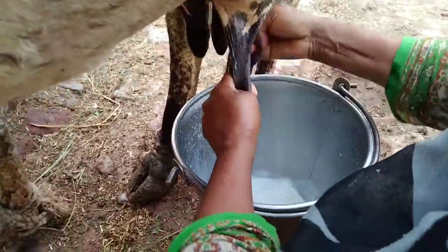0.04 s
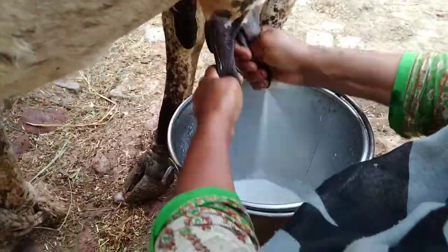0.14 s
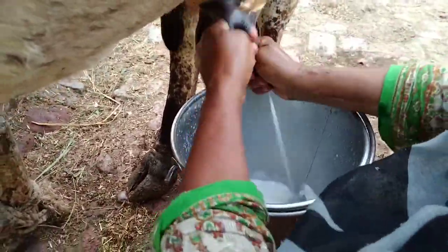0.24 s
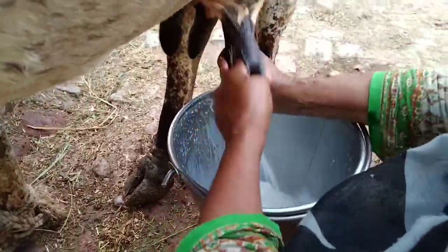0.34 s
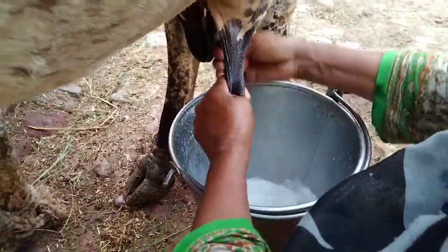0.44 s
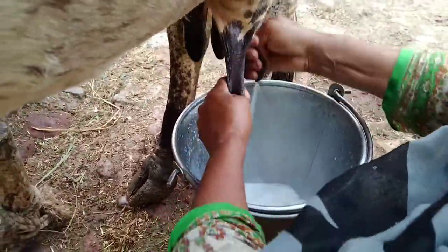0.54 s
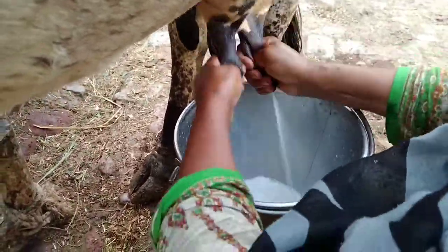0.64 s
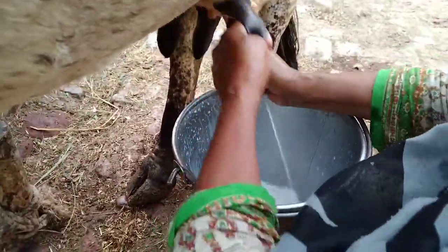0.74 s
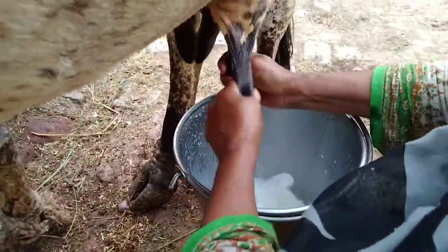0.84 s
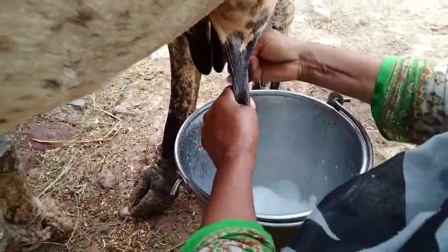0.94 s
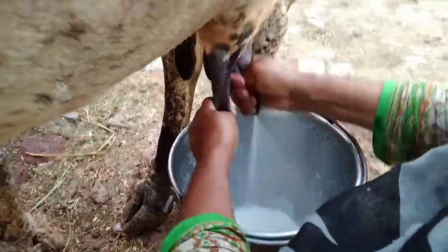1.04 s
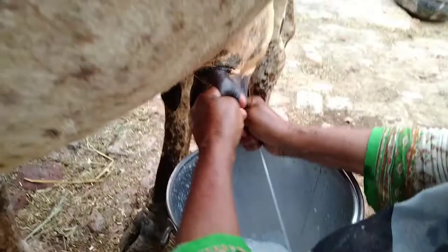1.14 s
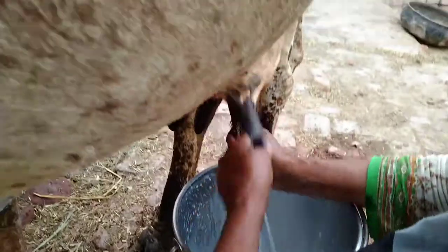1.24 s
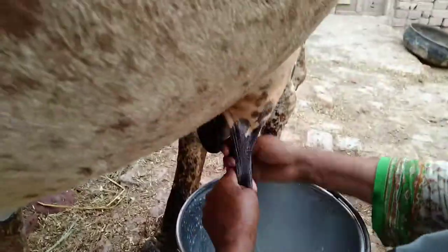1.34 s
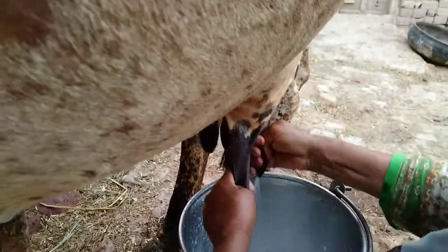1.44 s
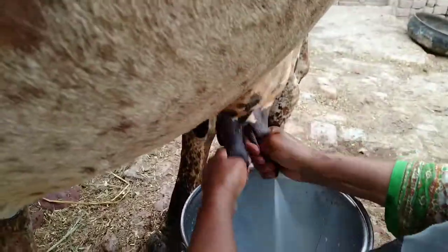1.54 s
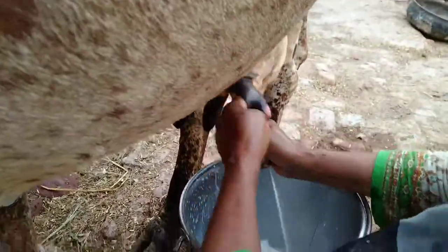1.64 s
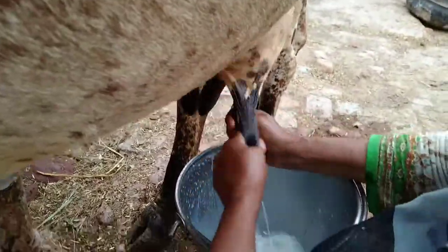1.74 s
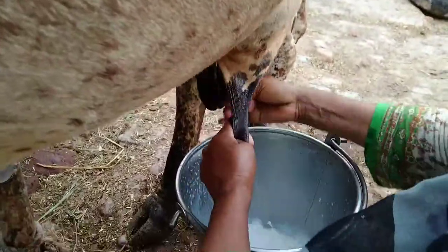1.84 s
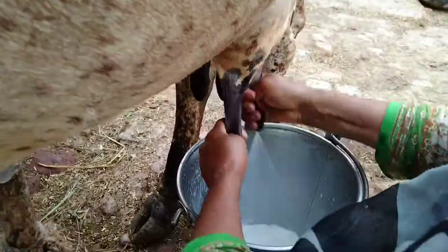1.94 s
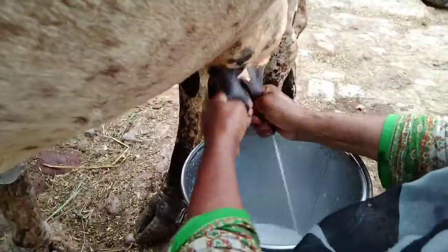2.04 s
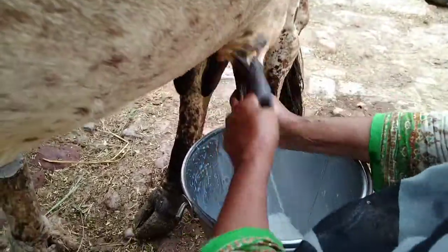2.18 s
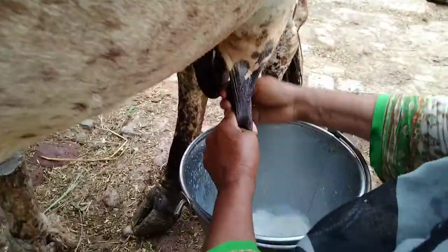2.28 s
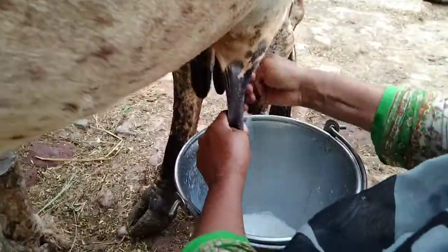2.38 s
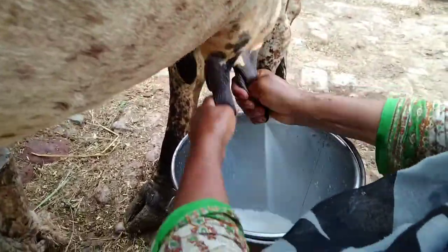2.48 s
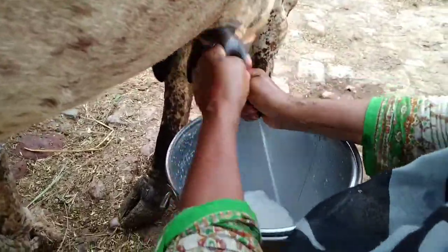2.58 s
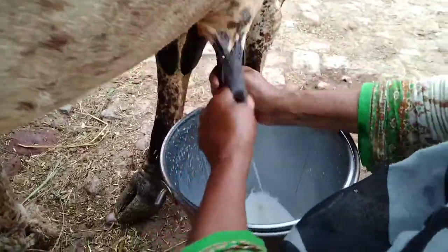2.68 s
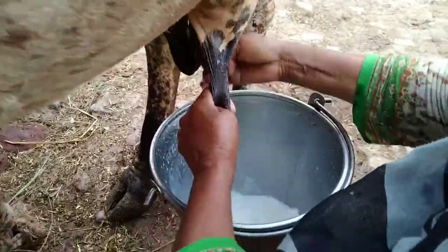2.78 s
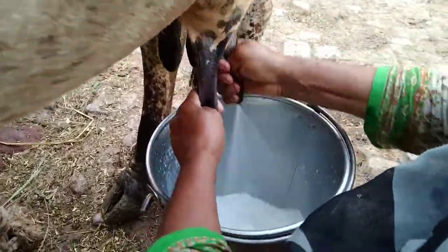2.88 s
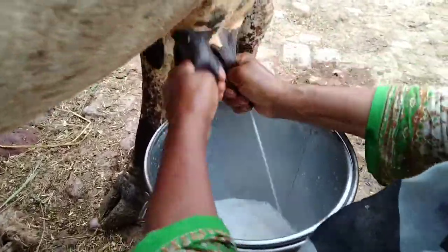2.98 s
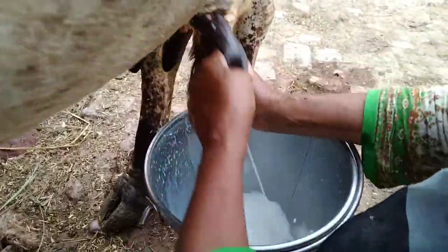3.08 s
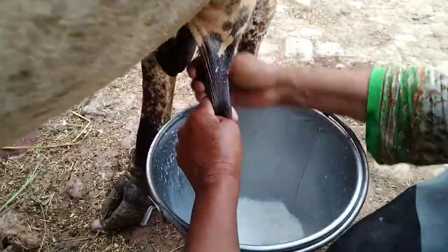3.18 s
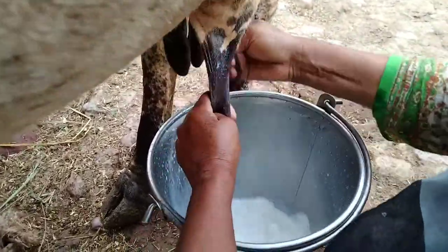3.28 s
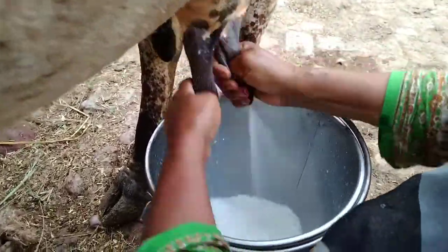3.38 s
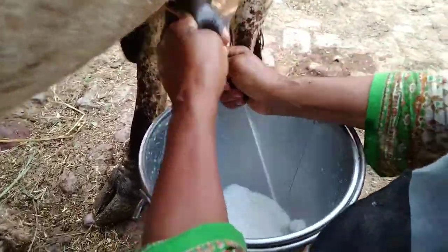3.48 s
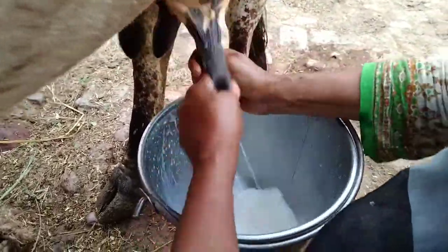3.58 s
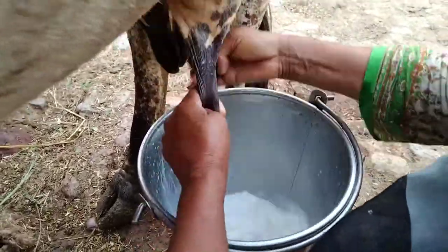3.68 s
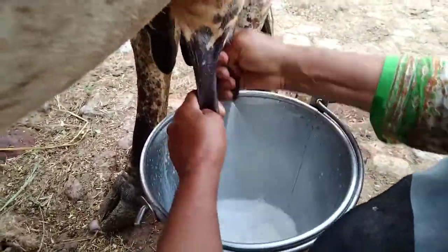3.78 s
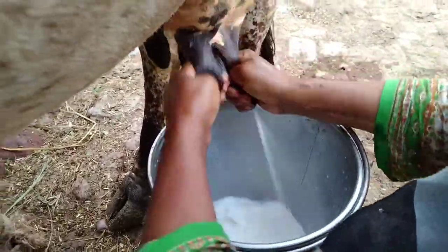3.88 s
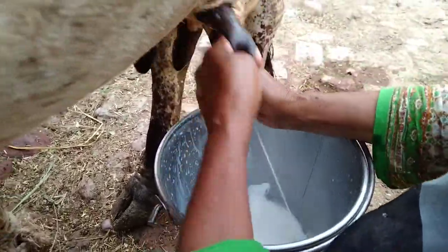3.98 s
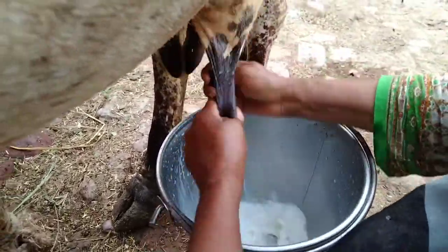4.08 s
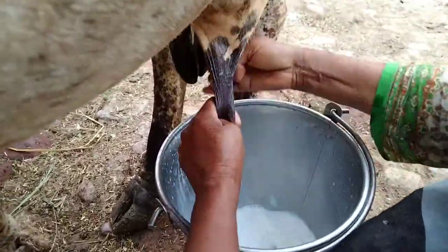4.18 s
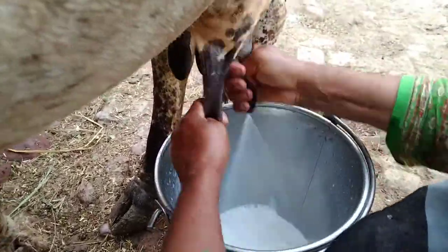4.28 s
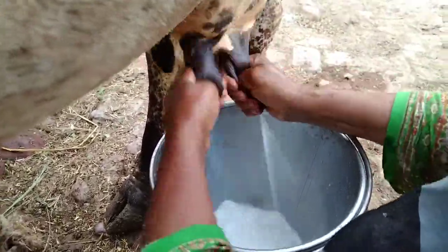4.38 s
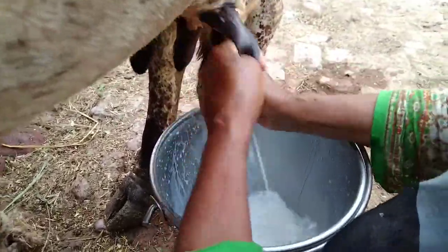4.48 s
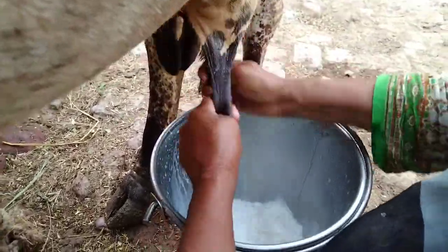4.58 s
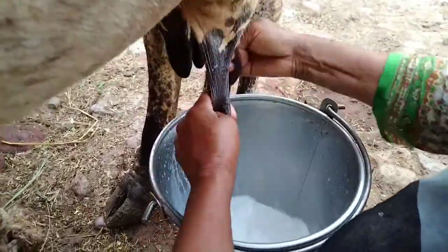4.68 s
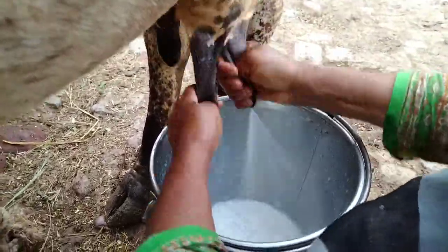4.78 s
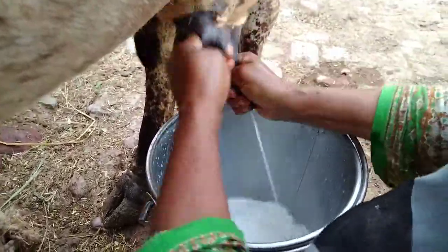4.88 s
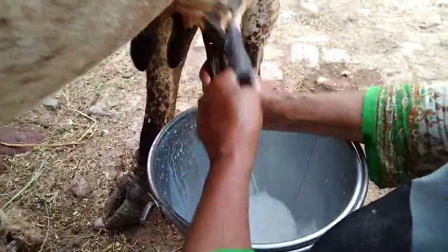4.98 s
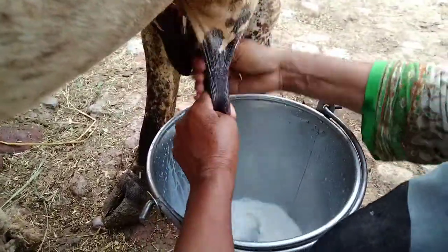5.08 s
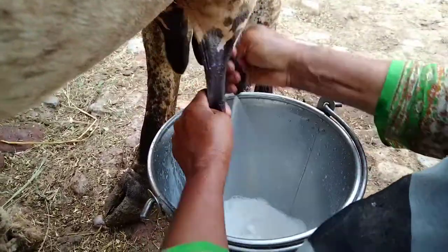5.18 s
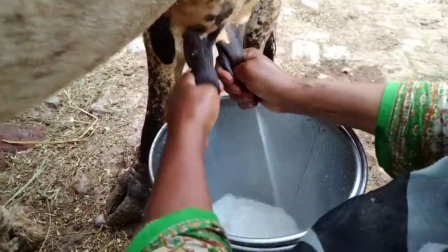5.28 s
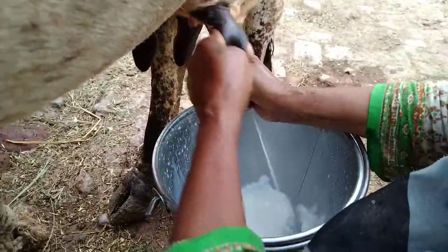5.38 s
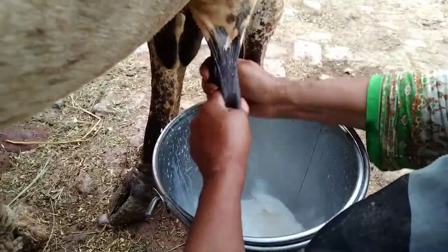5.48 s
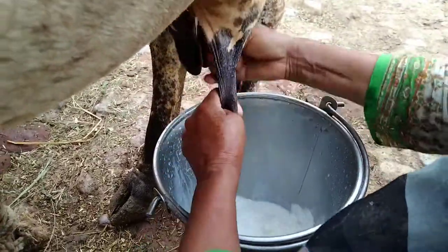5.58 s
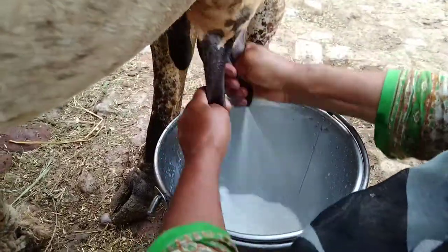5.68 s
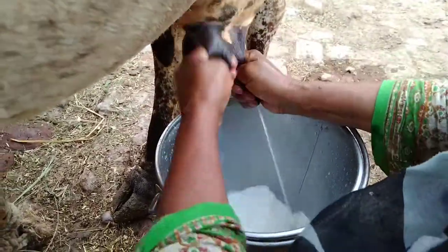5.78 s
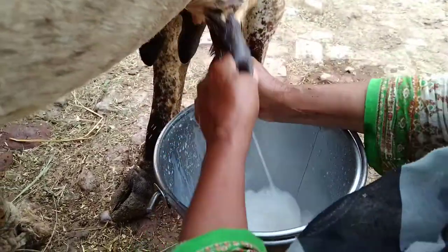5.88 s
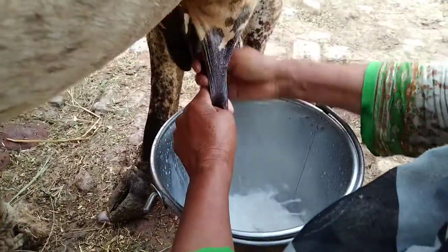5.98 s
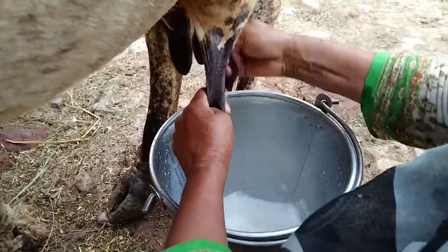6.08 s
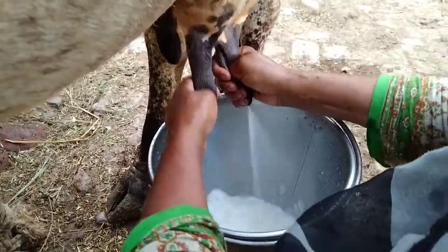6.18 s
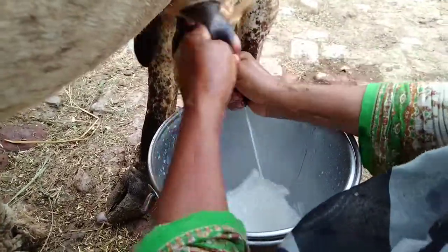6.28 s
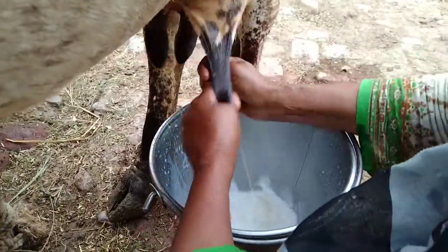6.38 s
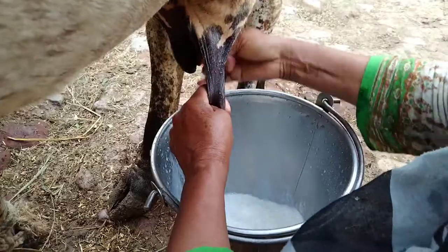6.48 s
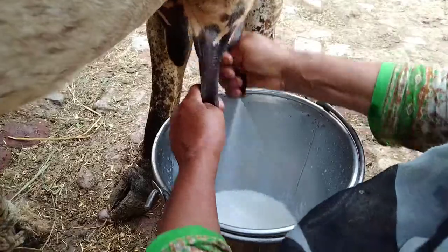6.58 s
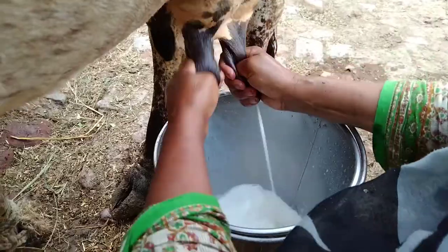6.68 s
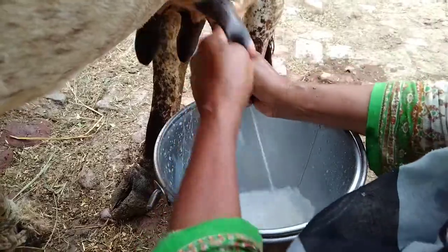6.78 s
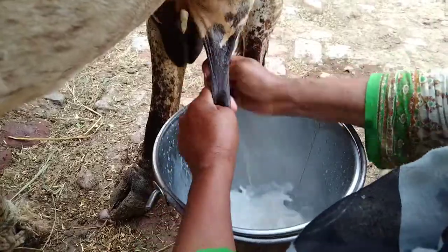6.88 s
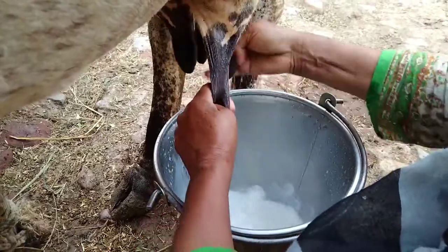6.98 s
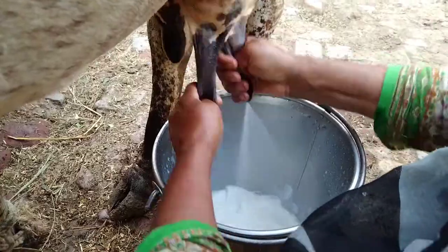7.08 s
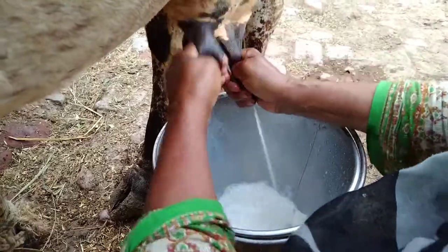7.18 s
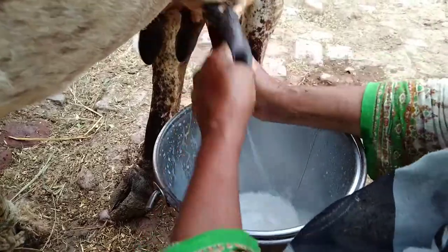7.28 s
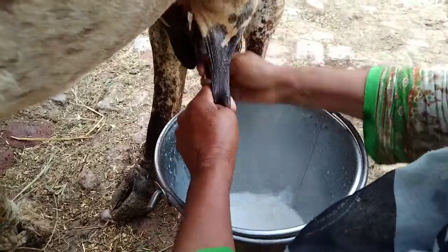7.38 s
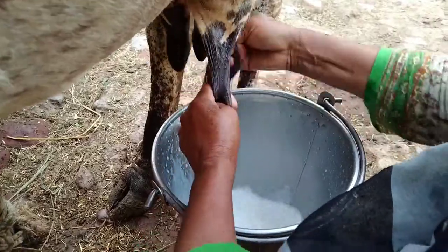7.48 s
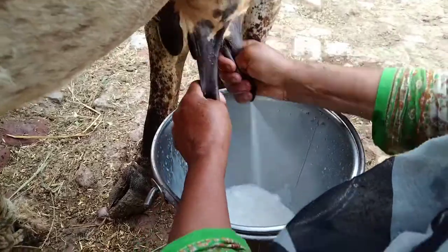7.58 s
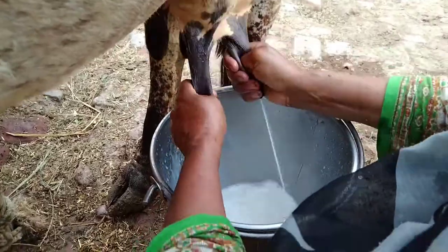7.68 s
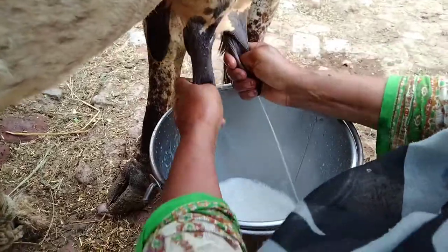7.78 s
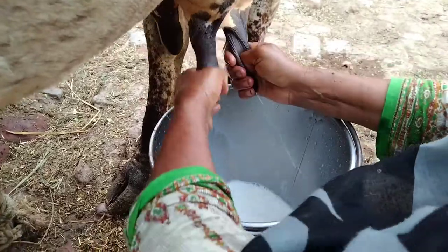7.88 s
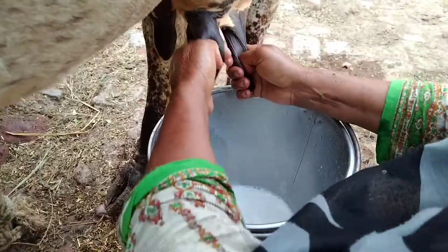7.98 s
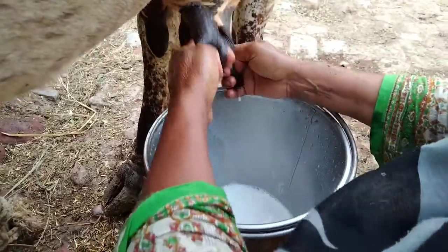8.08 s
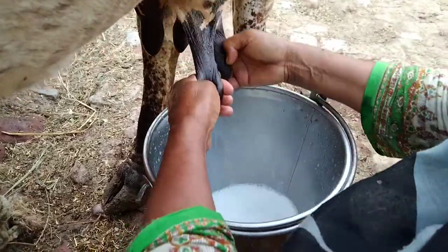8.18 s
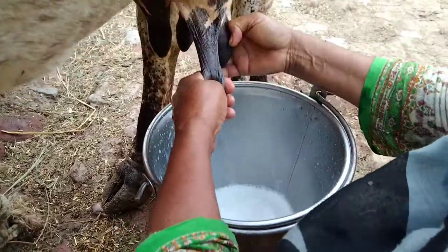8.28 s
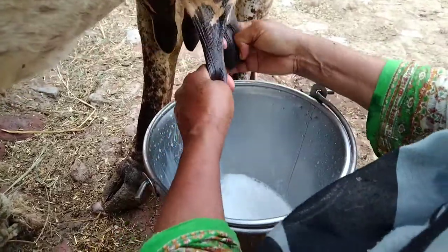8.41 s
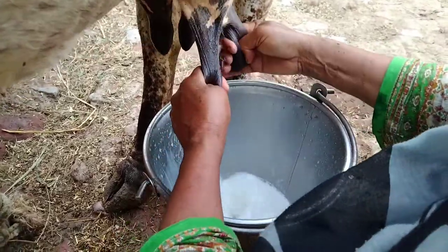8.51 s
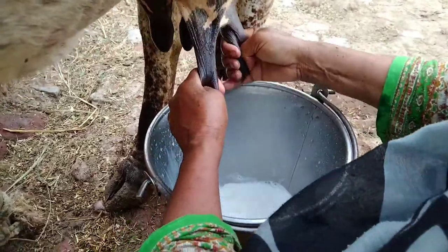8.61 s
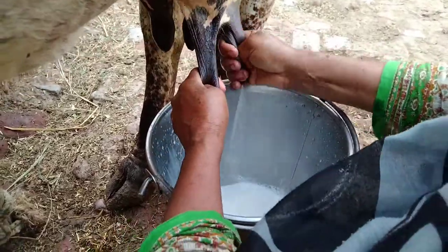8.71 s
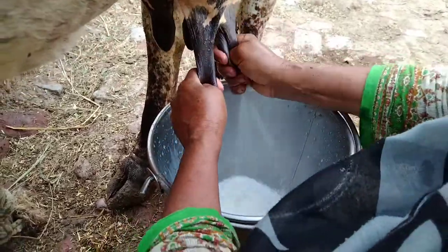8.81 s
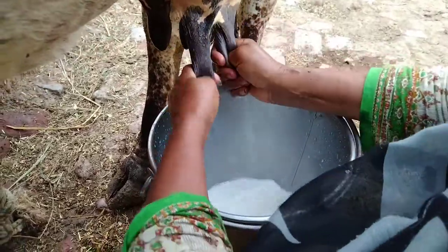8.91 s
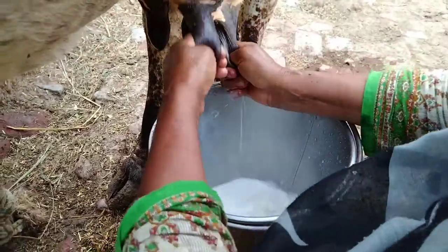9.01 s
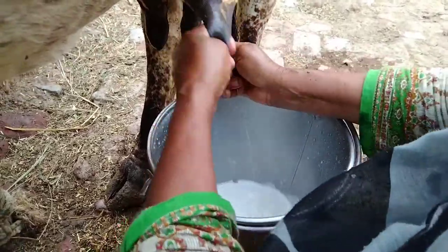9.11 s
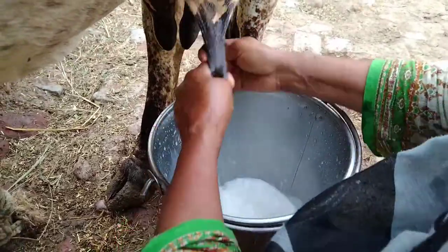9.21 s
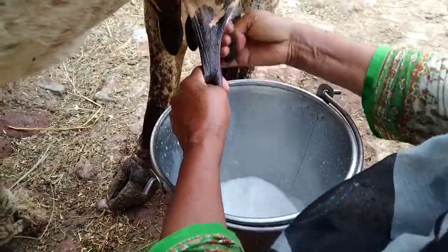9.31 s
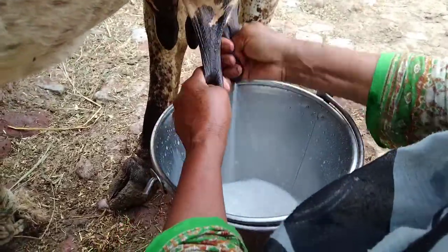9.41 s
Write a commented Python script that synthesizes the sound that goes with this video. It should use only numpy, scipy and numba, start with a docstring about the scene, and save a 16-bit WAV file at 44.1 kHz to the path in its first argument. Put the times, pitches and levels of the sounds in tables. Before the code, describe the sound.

Close rhythmic hand milking: sharp hissing spurts strike a steel bucket, gurgle into foam with hollow booms, pause briefly, then resume more slowly.

```python
"""A cow is milked by hand into a steel pail, a phone close by; a quiet farmyard hum lies under it. A few drops
lead each squirt, then the jet hisses as noise and drums on the ringing wall, two hands taking turns. It plunges
through the froth in a swarm of sine bubbles; the air in the pail booms, large air pockets gulp out short
pitched tones and now and then a lone small drop blips. After a pause near 8 s the last squirts come slower."""
import sys
import numpy as np
from scipy import signal
from scipy.fft import rfft, irfft, next_fast_len
from scipy.io import wavfile
from scipy.ndimage import uniform_filter1d
from numba import njit

SR = 44100
rng = np.random.default_rng(int(sys.argv[2]) if len(sys.argv) > 2 else 0)


def dump(signal):
    """Clip the signal to [-1, 1] and save it as 16-bit WAV at the path in sys.argv[1]."""
    limited = np.clip(np.atleast_2d(signal).T, -1, 1)
    pcm = np.round(limited * 32767).astype(np.int16)
    wavfile.write(sys.argv[1], SR, pcm)


N = 416744

# squeezes of a teat, hands alternating; levels relative:
# start_s, length_s, fade_db_per_s, hiss_db, mist_above_hiss_db, drum_db
SQUIRTS = [(-0.068, 0.2, 150, -37, 10.5, -25.5), (0.206, 0.16, 142, -33, 6, -26),
           (0.39, 0.26, 253, -39.5, 14.5, -27), (0.655, 0.19, 117, -36, 9.5, -30.5),
           (0.872, 0.2, 246, -37, 11.5, -27.5), (1.119, 0.12, 82, -33, 9, -28),
           (1.304, 0.25, 177, -38.5, 8.5, -29), (1.589, 0.19, 200.5, -35.5, 6, -30),
           (1.747, 0.25, 180, -35.5, 3, -28.5), (2.056, 0.19, 71, -32.5, -3, -27.5),
           (2.261, 0.23, 211, -33.5, -4, -28), (2.522, 0.24, 129.5, -33.5, -3, -30),
           (2.742, 0.2, 160, -34, -0.5, -27), (2.975, 0.19, 124, -32.5, -5.5, -29.5),
           (3.166, 0.21, 203, -32.5, -6, -27), (3.427, 0.15, 74, -33, -0.5, -28),
           (3.645, 0.21, 192, -31.5, -3.5, -26), (3.884, 0.2, 203, -34, -2, -27.5),
           (4.096, 0.26, 206, -35, 3, -24.5), (4.366, 0.19, 128, -34.5, 0, -27),
           (4.585, 0.21, 152, -32.5, -0.5, -23.5), (4.842, 0.18, 220.0, -33.5, -5, -26.5),
           (5.037, 0.25, 278, -34.5, 1, -23.5), (5.297, 0.074, 80, -30, -2.5, -23),
           (5.507, 0.21, 368, -33.5, 0.5, -24.5), (5.744, 0.2, 89, -34, -7, -28),
           (5.962, 0.23, 260.0, -33.5, -3, -24.5), (6.21, 0.2, 102, -33, -6.5, -27),
           (6.41, 0.24, 208, -34.5, -2.5, -25.5), (6.683, 0.054, 67, -33, -1, -24),
           (6.895, 0.23, 374, -33.5, -3, -25), (7.16, 0.22, 454, -36.5, -2, -26),
           (7.352, 0.26, 229.5, -35, -1.5, -26), (7.637, 0.18, 111, -33, -7, -27),
           (8.447, 0.3, 214, -35.5, -3.5, -27), (8.853, 0.2, 233, -37.5, -2, -29),
           (9.225, 0.26, 297, -36.5, -4, -28)]
# jets breaking through the froth; levels relative:
# start_s, length_s, level_db, growth_start_to_end_db, bubble_pitch_hz, boom_pitch_hz, boom_db
PLUNGES = [(0.072, 0.11, -33, 10, 1570, 336, -30.5), (0.342, 0.08, -24.5, 4.5, 1517, 493, -49.5),
           (0.56, 0.066, -35, 6, 1720, 356, -39.5), (0.816, 0.078, -25, 4, 1380, 470, -44),
           (1.021, 0.085, -27.5, -4, 1370, 357, -29), (1.271, 0.08, -26, 3, 1466, 457, -52),
           (1.464, 0.11, -32.5, -6, 1435, 318, -33.5), (1.752, 0.067, -23.5, 3, 1396, 496, -42),
           (1.939, 0.099, -30.5, -7, 1340, 325, -32), (2.209, 0.066, -25, 7, 1468, 480, -58),
           (2.389, 0.13, -29.5, 4, 1384, 334, -35.5), (2.689, 0.064, -22, -1.5, 1400, 513, -37),
           (2.872, 0.091, -25, -4, 1470, 345, -28), (3.137, 0.068, -25, -14, 1676, 474, -50),
           (3.328, 0.066, -24, -5, 1270, 350, -27), (3.598, 0.063, -27.5, -6, 1680, 457, -62),
           (3.789, 0.12, -32.5, -8, 1490, 328, -33.5), (4.083, 0.055, -27.5, -8, 1720, 470, -58),
           (4.294, 0.05, -28.5, -11, 1250, 330, -33), (4.551, 0.055, -24.5, -9, 1588, 490, -38),
           (4.738, 0.081, -27.5, 6, 1560, 328, -30.5), (5.01, 0.06, -23.5, -3.5, 1772, 490, -38),
           (5.183, 0.07, -25, -1, 1550, 383, -34), (5.448, 0.088, -26, -4.5, 1745, 470, -68),
           (5.642, 0.067, -27.5, 15, 1820, 324, -33.5), (5.905, 0.087, -24, -2.5, 1755, 470, -57),
           (6.102, 0.095, -29, 2, 1697, 332, -35), (6.388, 0.064, -21.5, 5, 1440, 515, -43),
           (6.576, 0.059, -23.5, 1, 1760, 342, -32.5), (6.823, 0.068, -22, -4, 1397, 350, -30),
           (7.041, 0.067, -26, 19, 1853, 358, -34), (7.316, 0.053, -20.5, 5, 1700, 464, -41.5),
           (7.529, 0.095, -26.5, -7, 1450, 330, -30.5), (8.563, 0.11, -34, 11, 1780, 315, -39),
           (8.667, 0.079, -22.5, -9, 1742, 494, -49), (9.377, 0.061, -25, 1, 1790, 330, -40)]


def undb(db):
    """Gain of a level in dB."""
    return 10 ** (np.asarray(db) / 20)


def level(x, db):
    """Scale to an rms level in dB."""
    return x * undb(db) / np.sqrt(np.mean(x ** 2))


def colour(x, points):
    """Shape a spectrum by (hz, db) points, interpolated over log frequency."""
    size = next_fast_len(N)
    hz, db = np.transpose(points)
    f_hz = np.arange(size // 2 + 1) * SR / size + 1  # +1 avoids log(0)
    gain = undb(np.interp(np.log(f_hz), np.log(hz), db))
    return irfft(rfft(x, size) * gain, size)[:N]


def ring(x, hz, width_hz):
    """One resonance, gain 1 at its centre."""
    return signal.lfilter(*signal.iirpeak(hz, hz / width_hz, SR), x)


def walk(rate_hz):
    """Random levels held 1 / rate_hz and slewed twice; spread near 1."""
    hold = int(SR / rate_hz)
    held = np.repeat(rng.standard_normal(N // hold + 1), hold)
    slewed = uniform_filter1d(uniform_filter1d(held, hold), hold)
    return 1.3 * slewed[:N]


def drops(scatter_db):
    """Dense droplets of uneven size: noise with a random level per sample."""
    return rng.standard_normal(N) * undb(scatter_db * rng.standard_normal(N))


@njit
def bubbles(start, hz, gain, cycles, glide, length):
    """Each bubble is a sine that swells in half a cycle and decays over some cycles while its pitch climbs."""
    out = np.zeros(length)
    for k in range(len(start)):
        step = 2 * np.pi * hz[k] / SR
        span = int(5 * cycles * SR / hz[k])
        for i in range(min(span, length - start[k])):
            age = i * hz[k] / (SR * cycles)  # in decay times
            shape = np.exp(-age) - np.exp(-age * 2 * cycles)
            out[start[k] + i] += gain[k] * shape * np.sin(step * i * (1 + glide * age))
    return out


def pail(x, ring_db, steel_db, wander_db):
    """Wall modes ring on top of the direct sound, each wavering as the jet lands elsewhere; bare steel rings longer."""
    # wall modes, levels relative: pitch_hz, width_hz, level_db, long_ring_db
    wall_modes = [(488, 16, -9.5, -15.5), (775, 72, -7, -23), (974.3, 35, -6.5, -0.5),
                  (1206, 85, -8.5, -6.5), (1336, 85, -12, -16), (1532, 55, -5, 3.5), (1781, 34, -13, -1),
                  (1971, 40, -11.5, -8), (2187, 22, -12, -15), (2368, 49, -10.5, -24), (2600, 25, -8, -18),
                  (2860, 24, -16, -30)]
    steel_q = 190
    out = x
    for hz, width_hz, db, long_db in wall_modes:
        struck = x * undb(wander_db * walk(13))
        short_ring = undb(ring_db + db) * ring(struck, hz, width_hz)
        long_ring = ring(struck * undb(steel_db + long_db), hz, hz / steel_q)
        out = out + short_ring + long_ring
    return out


def pressure(level_db, sag_db_per_s, linger, lead_db):
    """Gain over time of all squirts: drops lead, the jet rises, sags while the hand closes, then dies away."""
    land_s = 0.025  # the stream needs this long to reach the pail
    splat, splat_s = 0.071, 0.004  # share of strength landing at once, its build-up
    rise_s, lead_s = 0.086, 0.022  # pressure build-up; run of the leading drops
    rest_s, slow_start = 0.48, 0.12  # a longer gap between squirts starts softly: s of build-up per s beyond it
    tail_s, tail_fade_db_per_s = 0.27, 349  # after this long the tail of a squirt fades faster, by this much
    start_s, length_s, fade_db_per_s = np.array(SQUIRTS)[:, :3, None].transpose(1, 0, 2)
    t = np.arange(0, N + 64, 64) / SR
    age_s = np.maximum(t - start_s, 0)
    gap_s = np.diff(start_s, axis=0, prepend=start_s[:1])
    soft_s = slow_start * np.maximum(gap_s - rest_s, 0)

    db = level_db[:, None] - sag_db_per_s * np.minimum(age_s, length_s)
    db = db - linger * np.abs(fade_db_per_s) * np.maximum(age_s - length_s, 0)
    db = db - tail_fade_db_per_s * np.maximum(age_s - length_s - tail_s, 0)

    first_splat = splat * np.clip((age_s - land_s) / (splat_s + soft_s) + .5, 0, 1)
    build = (1 - np.exp(-np.maximum(age_s - land_s, 0) / rise_s)) ** 1.315
    lead = undb(lead_db) * np.exp(np.minimum(t - start_s, 0) / (lead_s + soft_s / 2))
    strength = (first_splat + build + lead) * undb(db)
    total = np.sqrt(np.sum(strength ** 2, axis=0))  # squirts add in power
    return np.interp(np.arange(N) / SR, t, total)


def fizz(count=7000):
    """Small bubbles of every pitch form wherever the stream meets the froth."""
    when, pitch, size = rng.random((count, 3)).T
    hz = 500 * 8.0 ** pitch
    gain = (1 - .999 * size) ** -.36 * np.sqrt(hz / 1500)
    return bubbles((when * N).astype(np.int64), hz, gain, 12.5, 0.012, N)


def jets():
    """Spray hiss and mist come straight from the stream; drops and small bubbles drum on the pail."""
    # drumming before the wall rings: freq_hz, level_db
    drum_colour = [(120, -33.5), (250, -22), (500, -16.5), (900, -9.5), (1500, -0.5), (3000, -2),
                   (4500, -15.5), (7000, -45)]
    # drumming's long ring, jets wandering between froth and bare steel: time_s, ring_db
    on_steel = [(0, 9.5), (.9, 2), (1.4, 7), (2.3, 12), (3.3, 10.5), (4.5, 6), (6, -12), (7.6, -14),
                (7.8, 14.5), (8.0, 15), (8.4, 0), (9.45, -1)]
    hiss_colour = [(3000, -6.0), (4500, -2.0), (5200, -1.5), (6600, 2.5),
                   (8000, -9.5), (9500, -11.5), (11000, -14.5), (13000, -7.5)]
    mist_colour = [(1500, 2.0), (2600, -6.0), (3800, 4.5), (5200, 1.0), (8000, 2.5),
                   (11000, -1.0), (13000, 2.5), (14600, 12.5), (16000, 7.5)]
    spray_sag_db_per_s, drum_sag_db_per_s = 49.5, 31  # pressure slackens
    spray_lead_db, drum_lead_db = -39, -24.5  # leading drops
    air_hz = 321  # air column of the pail
    hiss_db, mist_db, drum_db = np.array(SQUIRTS)[:, 3:].T
    patter_db = 1.1 * walk(60)  # the stream breaks up unevenly, in every band at once

    hiss = level(colour(drops(6.4), hiss_colour), -0.31) * undb(2.08 * walk(35))
    hiss = hiss * pressure(hiss_db, spray_sag_db_per_s, 1, spray_lead_db)
    mist = level(colour(drops(4.9), mist_colour), -0.18) * undb(1.93 * walk(28))
    mist = mist * pressure(hiss_db + mist_db, spray_sag_db_per_s, 1.2, spray_lead_db)  # fades faster
    spray = undb(patter_db) * (hiss + mist)

    beat = level(colour(drops(3.4), drum_colour), -3.5) + level(fizz(), -4.0)
    beat = beat * undb(patter_db + 1.0 * walk(25)) * pressure(drum_db, drum_sag_db_per_s, 1, drum_lead_db)
    air = ring(ring(beat, air_hz, 73.315), air_hz, 150) * undb(3.0 * walk(22))
    steel_db = np.interp(np.arange(N) / SR, *np.transpose(on_steel))
    return spray + undb(-4.5) * pail(beat, 0.4, steel_db, 3.4) + undb(18.0) * air


def plunges(count=320):
    """Bubbles swarm while the jet digs its hole; in narrow holes their pitch drops as they grow."""
    # froth muffles the smallest and largest bubbles: freq_hz, level_db
    froth_colour = [(150, -48), (400, 10), (700, -0.5), (3000, 0), (4200, -5.5), (8000, -35)]
    narrow_hz = 420  # narrow holes boom above this pitch
    narrow_fall_oct, wide_fall_oct = 1.034, -0.18  # negative: pitch rises
    fall_grows_s = 4.48  # the narrow drop deepens as the froth thickens, up to this time
    splash_share, splash_hz = .15, 3454  # tiny bright bubbles: mean share, median pitch
    start_s, length_s, db, growth_db, mid_hz, boom_hz = np.array(PLUNGES)[:, :6, None].transpose(1, 0, 2)
    deepening = np.minimum(1, start_s / fall_grows_s) ** 2
    fall_oct = np.where(boom_hz > narrow_hz, narrow_fall_oct * deepening, wide_fall_oct)

    place = (np.arange(count) + rng.random((len(PLUNGES), count))) / count
    share = -.06 + 1.1 * place  # a few bubbles lead and trail the burst
    spread = rng.standard_normal(place.shape)
    size_db = 1.96 * rng.exponential(size=place.shape)

    hz = mid_hz * 2 ** (-fall_oct * (share - .5)) * np.exp((0.33 + 0.145 * place) * spread)
    hz = np.clip(hz, 300, 4600)
    is_splash = rng.random(place.shape) < splash_share * (1.5 - place)
    hz = np.where(is_splash, np.minimum(splash_hz * np.exp(.2 * spread), 5000), hz)

    swell = np.minimum(1, 3.8 * np.minimum(1.4 * place, 1 - place))  # quick rise, level top, slower end
    gain = undb(db + growth_db * (share - .5) + size_db) * swell * np.sqrt(length_s * hz / 1500)
    start = np.clip((start_s + share * length_s) * SR, 0, N - 1).astype(np.int64)
    swarm = bubbles(start.ravel(), hz.ravel(), gain.ravel(), 7.0, 0.019, N)
    swarm = swarm * undb(2.7 * walk(90))  # bubbles come in clusters
    return undb(-5.0) * pail(colour(swarm, froth_colour), 11.45, -1.5, 3.8)


def booms():
    """The closing hole gives uneven kicks that pump the resonant air in the pail, each boom at its own pitch."""
    out = np.zeros(N)
    t = np.arange(int(.4 * SR)) / SR - .2
    for start_s, length_s, _, _, _, hz, db in PLUNGES:
        lag_s = .65 * length_s
        kicks = rng.standard_normal(len(t)) * (rng.random(len(t)) < .006)
        air = ring(ring(kicks, hz, 64.328), hz, 280)
        swell = np.exp(-.5 * (t / (0.013 + 0.38 * length_s)) ** 2)
        air = level(air * swell, db - 12.0)
        at = np.arange(len(t)) + int((start_s + lag_s + t[0]) * SR)
        inside = (at >= 0) & (at < N)
        out[at[inside]] += air[inside]
    return out


def gulps():
    """Large air pockets collapse, each sounding one pitch, mostly near a ring of the pail: a sine swelling
    fast, rising slightly in pitch and dying away."""
    # air pockets, levels relative: peak_s, pitch_hz, level_db, length_s
    gulp_table = [(0.156, 357, -26, 0.01), (0.392, 1248, -19.5, 0.014), (0.394, 1510, -16.5, 0.0061),
                  (0.395, 481, -30, 0.023), (0.532, 403, -33, 0.033), (0.614, 1520, -22.5, 0.0078),
                  (0.666, 1565, -27.5, 0.0074), (0.835, 816, -31.5, 0.028), (0.871, 1480, -20, 0.0069),
                  (1.075, 1340, -16.5, 0.0062), (1.089, 343, -23, 0.028), (1.315, 1510, -19.5, 0.025),
                  (1.333, 1240, -18, 0.016), (1.545, 327, -21.5, 0.016), (1.793, 1570, -24, 0.013),
                  (1.81, 505, -30, 0.021), (2.243, 1585, -24, 0.012), (2.272, 1250, -25, 0.019),
                  (2.275, 1535, -20.5, 0.0057), (2.509, 318, -28, 0.045), (2.699, 1250, -23, 0.008),
                  (2.741, 505, -28.5, 0.021), (2.742, 1528, -18, 0.011), (2.896, 1270, -24, 0.0059),
                  (2.945, 359, -31, 0.03), (3.186, 1480, -19, 0.011), (3.369, 334, -23, 0.01),
                  (3.408, 308, -31, 0.044), (3.642, 1510, -24.5, 0.025), (3.852, 1494, -24, 0.01),
                  (3.87, 317, -22, 0.034), (4.115, 1503, -26, 0.019), (4.316, 922, -20, 0.0096),
                  (4.321, 1996, -21, 0.006), (4.343, 329.6, -22, 0.034), (4.568, 1540, -11, 0.0093),
                  (4.569, 2700, -19.5, 0.0053), (4.583, 2034, -27, 0.008), (4.584, 483, -28, 0.022),
                  (4.78, 494, -28, 0.016), (5.016, 2648, -20, 0.01), (5.033, 1513, -15.5, 0.025),
                  (5.035, 1970, -21, 0.0071), (5.248, 484, -25, 0.0066), (5.455, 2760, -23.5, 0.0082),
                  (5.512, 1510, -14.5, 0.0063), (5.942, 1160, -23, 0.0076), (5.944, 2000, -23, 0.014),
                  (5.967, 1523, -21, 0.031), (5.981, 1340, -17, 0.0052), (6.092, 326, -34, 0.034),
                  (6.139, 1516, -20.5, 0.022), (6.147, 321, -26, 0.026), (6.407, 550, -29.5, 0.023),
                  (6.417, 1415, -25, 0.019), (6.418, 2325, -28, 0.013), (6.419, 1760, -29, 0.012),
                  (6.601, 1510, -26, 0.007), (6.601, 443, -28, 0.008), (6.622, 338, -33, 0.03),
                  (6.851, 1510, -15, 0.015), (6.865, 447, -19, 0.0094), (7.086, 317, -25, 0.028),
                  (7.33, 2640, -22, 0.012), (7.343, 2050, -22.5, 0.019), (7.361, 1550, -21.5, 0.029),
                  (7.558, 1470, -24, 0.0067), (7.695, 1550, -33, 0.012), (8.203, 1090, -62, 0.042),
                  (8.681, 2230, -28, 0.0065), (8.687, 1590, -21, 0.0084)]
    rise, fall = 0.35, 0.5  # time constants, shares of length
    glide_per_s = 1.5  # relative climb in pitch
    out = np.zeros(N)
    t = np.arange(int(.25 * SR)) / SR - .08
    turns = rng.random(len(gulp_table))
    for (peak_s, hz, db, length_s), turn in zip(gulp_table, turns):
        shape = 2 / (np.exp(-t / (rise * length_s)) + np.exp(t / (fall * length_s)))
        tone = np.sin(2 * np.pi * (turn + hz * t * (1 + glide_per_s * t / 2)))
        at = np.arange(len(t)) + int((peak_s + t[0]) * SR)
        out[at] += undb(db) * shape * tone
    return out * undb(1.9 * walk(110) - 2.5)


def small_drops():
    """Each lone small drop leaves one short pitched blip, a bubble that also rings the wall."""
    # drops, levels relative: start_s, level_db, pitch_hz
    drop_table = [(0.493, -25, 1840), (1.469, -21.5, 1310), (2.027, -24.5, 1270), (2.399, -22, 1270),
                  (2.511, -27, 1650), (4.277, -29, 958)]
    start_s, db, hz = np.transpose(drop_table)
    blip = bubbles((start_s * SR).astype(np.int64), hz, undb(db), 5.5, 0.019, N)
    return pail(blip, 3.0, 0, 0)


def yard():
    """A low outdoor hum of coloured noise; slices of it waver on their own."""
    # hum spectrum: freq_hz, level_db
    yard_colour = [(30, -0.5), (60, -9.5), (105, -0.5), (160, -7), (500, -10), (750, -43), (1100, -21),
                   (1600, -18.5), (2000, -37), (3000, -55), (15000, -66.5)]
    hum = colour(rng.standard_normal(N), yard_colour)
    slices = sum(ring(hum, hz, hz / 6) * undb(4.0 * walk(14)) for hz in 900 * 1.3 ** np.arange(7))
    return undb(walk(3.4)) * level(hum + 1.3 * slices, -60)


def scene():
    """Everything reaches one microphone."""
    return (jets() + plunges() + booms() + gulps() + small_drops() + yard())[None]


def record(dry):
    """The small microphone loses the deep bass and the phone cuts the top."""
    mic_low_hz, top_hz = 92, 15550
    thin = signal.sosfilt(signal.butter(3, mic_low_hz, "high", fs=SR, output="sos"), dry)
    return signal.sosfilt(signal.ellip(12, .2, 80, top_hz, fs=SR, output="sos"), thin)


dry = scene()
out = record(dry)
dump(out)
```